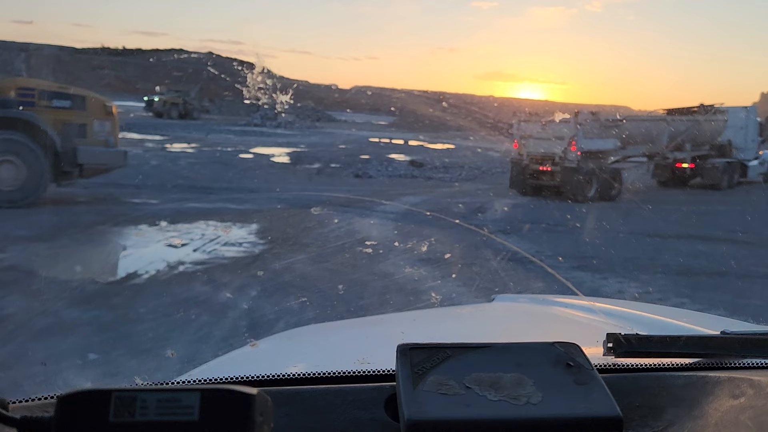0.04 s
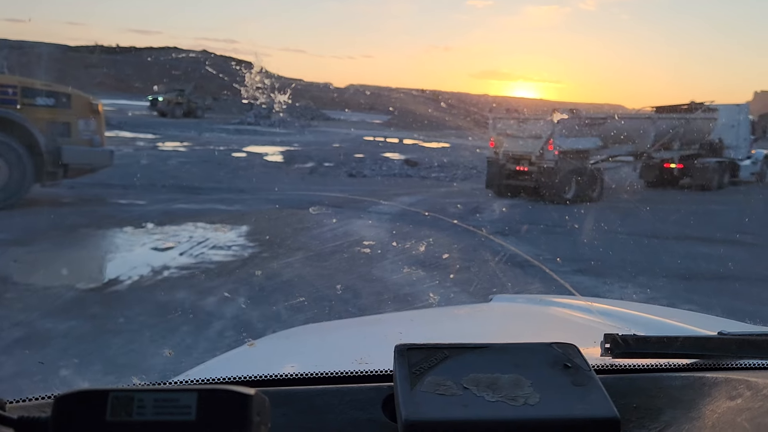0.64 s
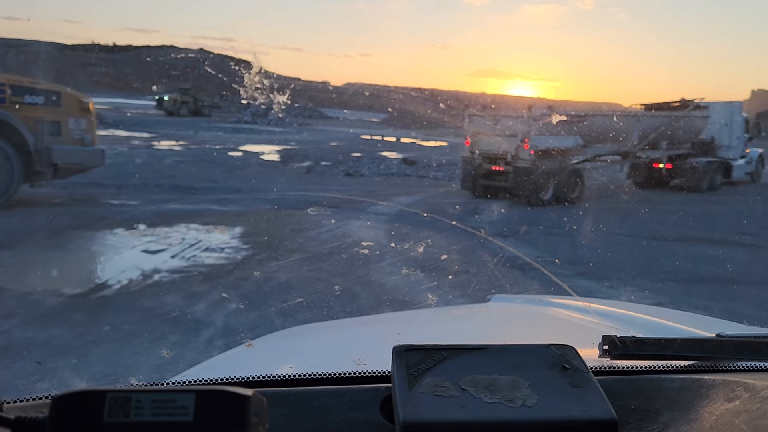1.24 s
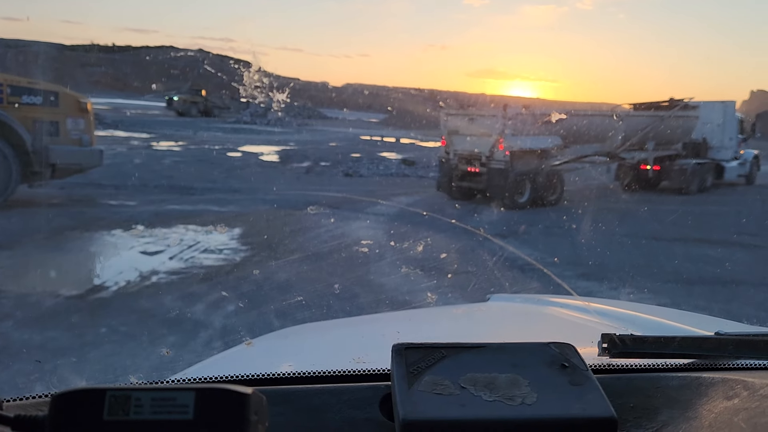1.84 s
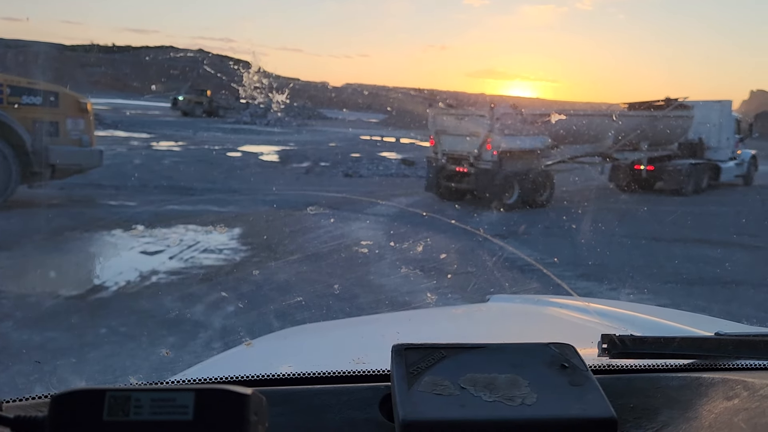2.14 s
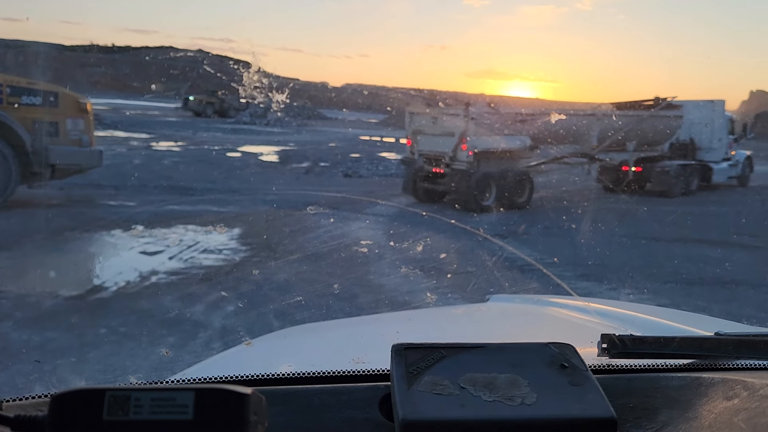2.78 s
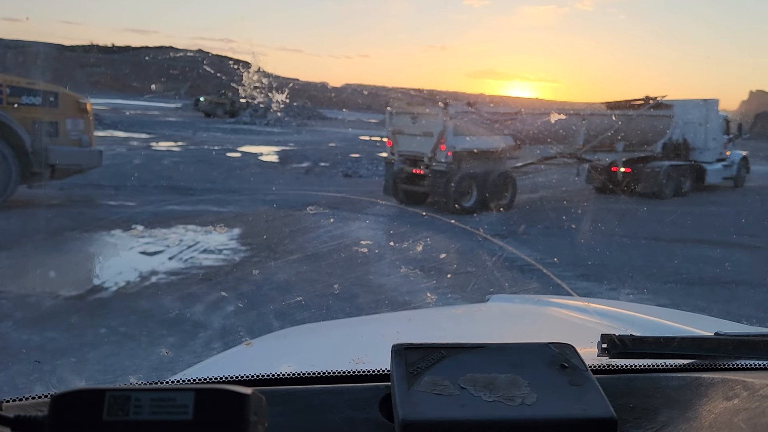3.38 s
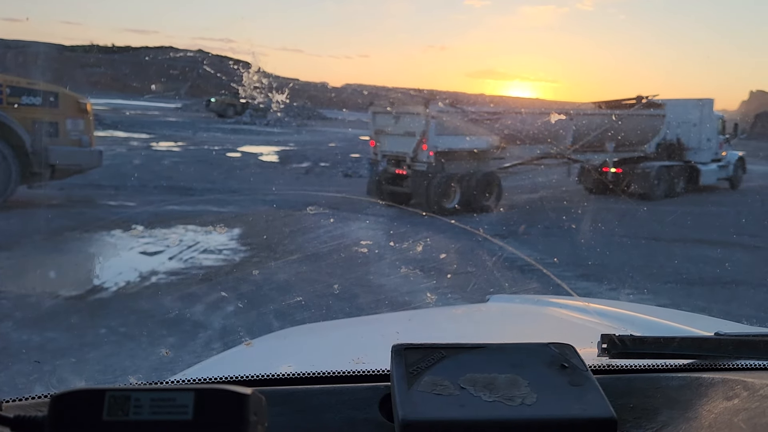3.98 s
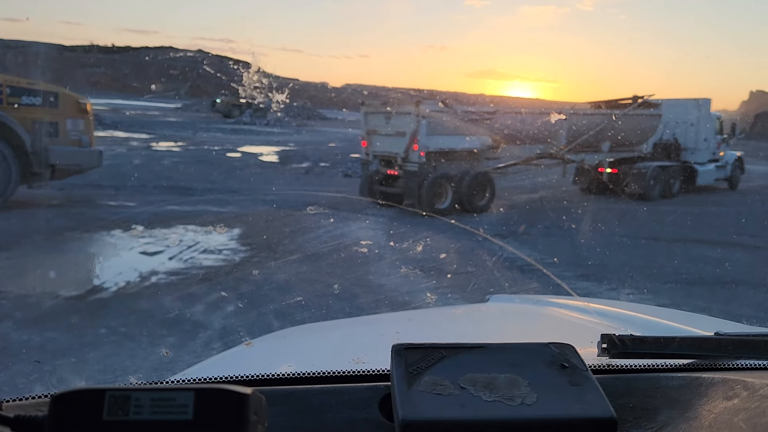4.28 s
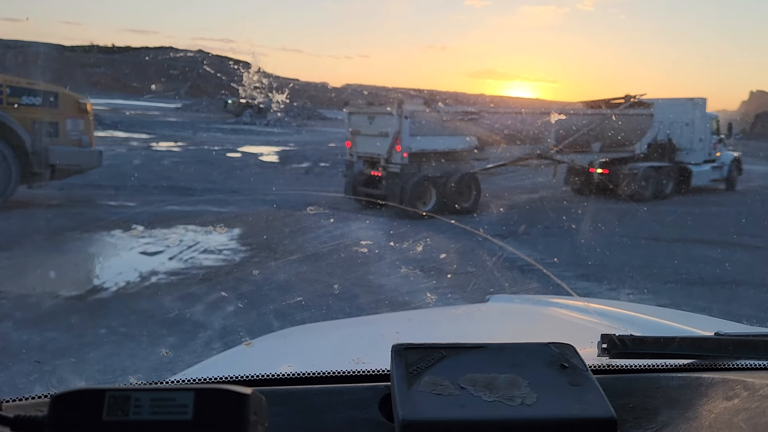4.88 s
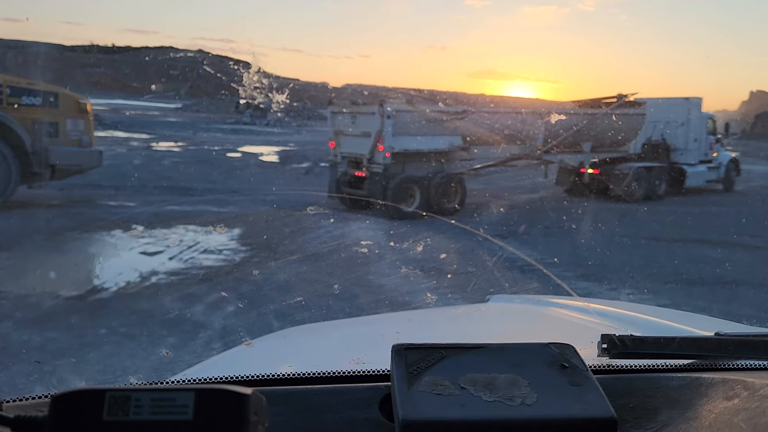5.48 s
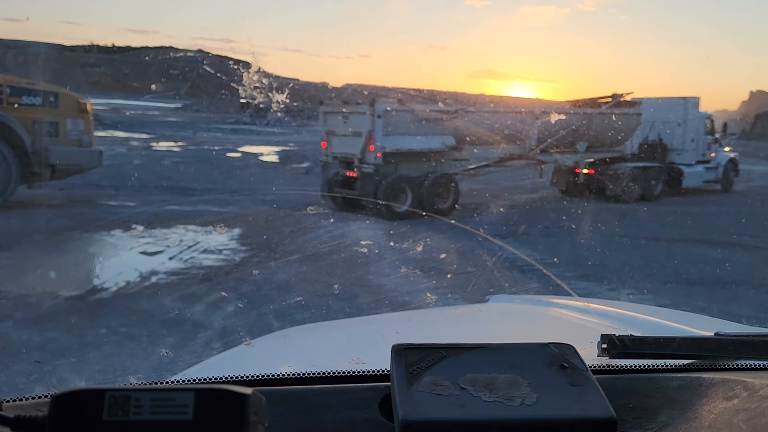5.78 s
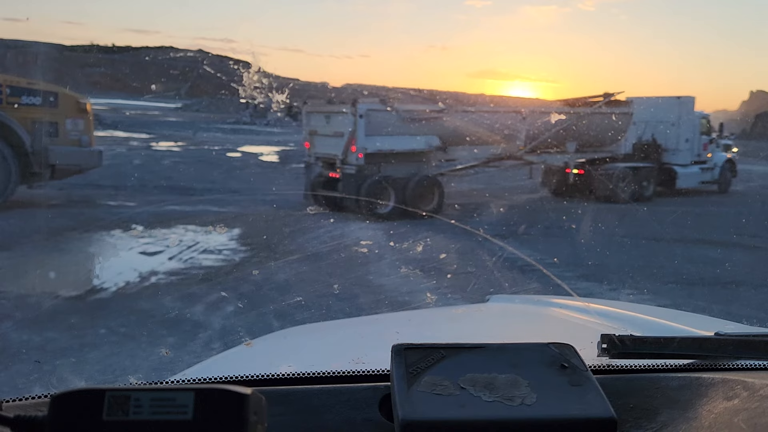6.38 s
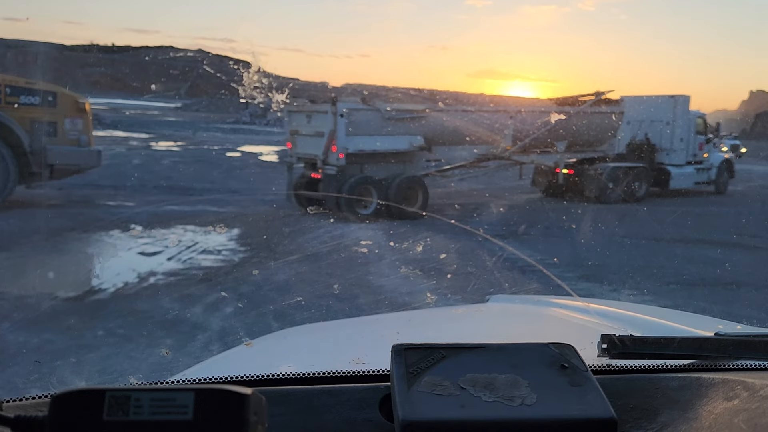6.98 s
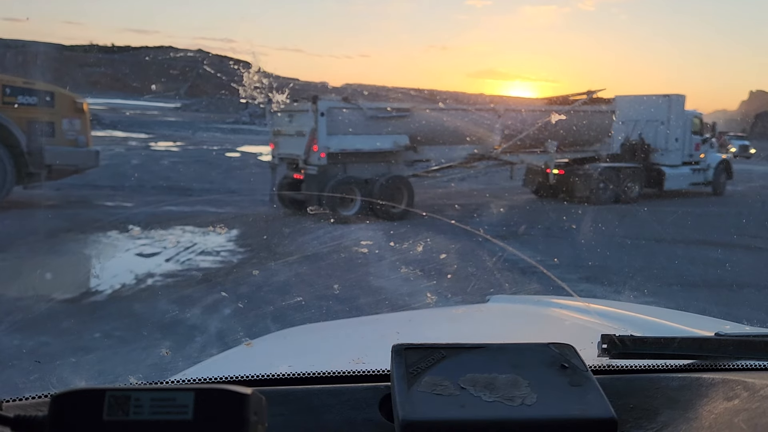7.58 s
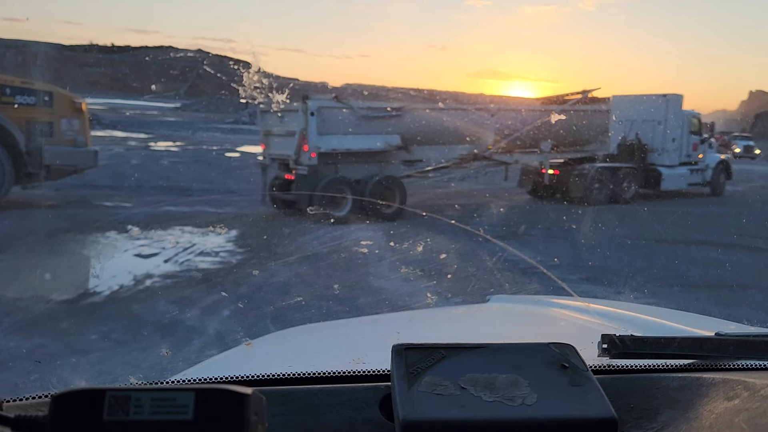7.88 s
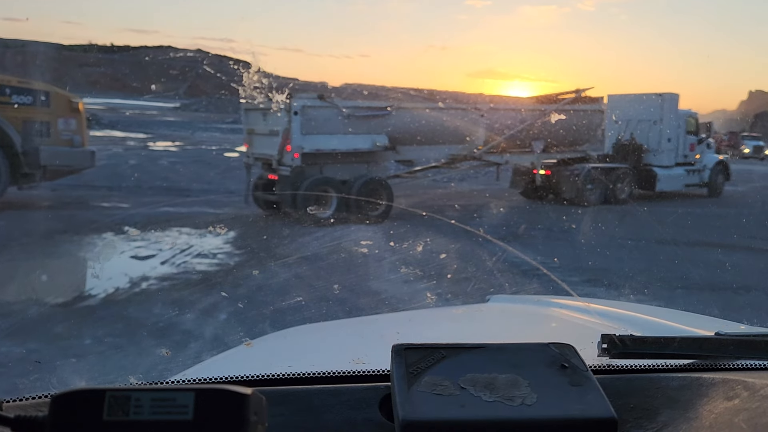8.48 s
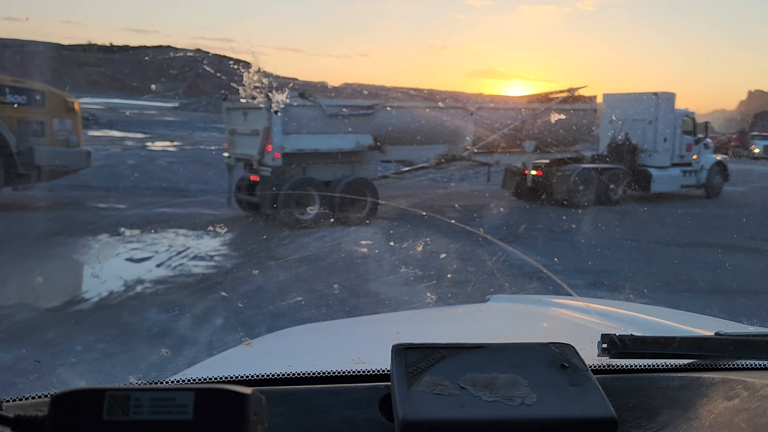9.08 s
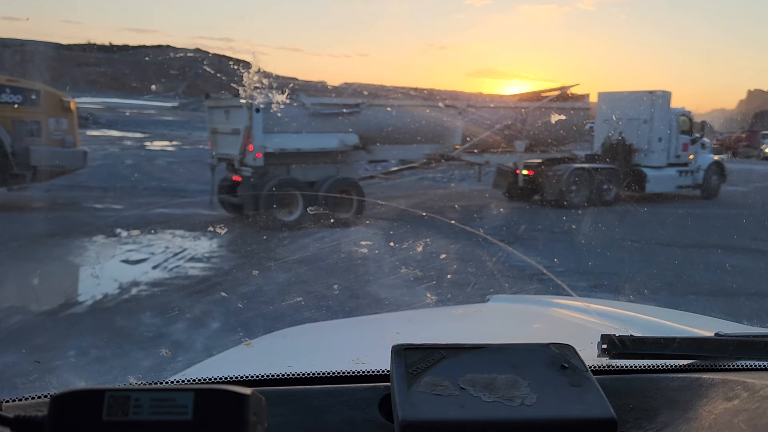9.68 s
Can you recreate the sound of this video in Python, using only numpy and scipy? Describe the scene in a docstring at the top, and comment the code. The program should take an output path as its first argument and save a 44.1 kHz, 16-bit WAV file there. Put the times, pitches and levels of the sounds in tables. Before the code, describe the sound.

From inside a truck cab, a low diesel drone and a fast, even throb continue as the tyres roll slowly over a gravel yard. The boom deepens as the engine takes up load, and a short burst of trim rattles is followed by another clack. Faint, high plastic squeaks come and go. The shuddering builds, peaks and eases, and the dashboard clicks near the end.

```python
"""A six-cylinder diesel truck creeps over a gravel yard at idle, heard from inside the cab.
From the start the firing drones, the tyres rumble and the cab thumps about twelve times a second;
clatter and air hiss come through the firewall, with thin whines and a ticking dashboard.
As the engine takes up load a plastic joint starts to squeak; trim rattles near 3 s and 5 s.
Around 7 s the idle sags and the cab shakes hardest, then the governor recovers and it settles."""
import sys
import numpy as np
from scipy import signal
from scipy.fft import rfft, irfft, next_fast_len
from scipy.io import wavfile

SR = 44100
rng = np.random.default_rng(int(sys.argv[2]) if len(sys.argv) > 2 else 0)


def generate_wav(sig):
    """Save sig (samples, or channels by samples) to the path in sys.argv[1] as 16-bit PCM at SR."""
    pcm = np.round(np.clip(np.atleast_2d(sig).T, -1, 1) * 32767).astype(np.int16)
    wavfile.write(sys.argv[1], SR, pcm)


N = 429534
LOADING_S = (0.68, 5.7)  # the engine takes up load between these times


def gain_of(db):
    """Decibels to a gain factor."""
    return 10 ** (np.asarray(db) / 20)


def unit_rms(x):
    """Scales to an rms of one."""
    return x / np.sqrt(np.mean(x ** 2) + 1e-20)


def ramp(start_s, end_s):
    """A linear fade from zero to one."""
    return np.clip((np.arange(N) / SR - start_s) / max(end_s - start_s, .01), 0, 1)


def automation(rows):
    """One lane, sample by sample, for each column after a table's times."""
    times_s, *columns = np.transpose(rows)
    return [np.interp(np.arange(N) / SR, times_s, column) for column in columns]


def add(mix, start_s, sound):
    """Mixes a sound in at a time."""
    part = mix[..., max(round(start_s * SR), 0):][..., :sound.shape[-1]]
    part += sound[..., :part.shape[-1]]


def bins():
    """Frequencies of the whole scene's spectrum."""
    return np.fft.rfftfreq(next_fast_len(N), 1 / SR)


def spectrum(points):
    """Joins breakpoints on a log-frequency axis, giving a value for each bin."""
    hz, value = np.transpose(points)
    return np.interp(np.log(bins() + 1), np.log(hz + 1), value)


def equalise(x, db):
    """Filters by a gain for each bin."""
    size = next_fast_len(N)
    return irfft(rfft(x, size) * gain_of(db), size)[..., :N]


def drift(rate_hz):
    """A smooth random modulator that rolls off above a rate."""
    return unit_rms(equalise(rng.standard_normal(N), -np.minimum(10 * (bins() / rate_hz) ** 2, 200)))


# How alike the cab sounds at the two ears: freq_hz, correlation
EAR_LIKENESS = [(30, 0.65), (130, 1), (250, 0.56), (500, 0.7), (1000, -0.17), (2000, 0), (12000, 0)]

def cab_noise(shape_db, drive=1.):
    """Driven noise filling the cab, at unit rms: alike at both ears in the bass, unrelated up high."""
    alike = np.clip(spectrum(EAR_LIKENESS), -.999, .999)
    mid, side = rng.standard_normal((2, N)) * drive
    mid = equalise(mid, shape_db + 10 * np.log10(1 + alike))
    side = equalise(side, shape_db + 10 * np.log10(1 - alike))
    return unit_rms(np.array([mid + side, mid - side]))


# The idle sags under load, then the governor recovers: time_s, firing_rate_hz
FIRING_RATE = [(0, 36.27), (6.2, 36.2), (7.0, 35.32), (7.9, 36.12), (9.1, 36.35), (9.6, 36.7)]

def engine_cycles():
    """Running count of four-stroke cycles: each is two crank turns and one firing per cylinder."""
    return np.cumsum(automation(FIRING_RATE)[0]) / SR / len(CYLINDER_KNOCKS)


# Strong engine tones, each fading to a new level: firing_multiple, before_db, after_db, start_s, end_s
BOOM_TONES = [(1, -27, -17, 1.3, 4.2), (2, -24.6, -20.3, 6.3, 6.8), (2.5, -29, -24.5, 2.5, 8),
              (4, -28, -25, 7.4, 8.1)]
# Weaker engine tones: upper firing harmonics, plus tones between them that make the idle lope:
# cycle_multiple, level_db
WEAK_TONES = [(4, -44), (5, -42), (9, -32.5), (11, -38), (13, -38), (14, -38), (16, -42), (18, -35.5),
              (21, -44), (23, -46), (26, -43), (30, -43), (32, -39), (36, -45), (42, -47), (44, -49),
              (48, -47), (60, -57)]

def drone(cycles, ease_from_s=4.5, ease_db_per_s=0.73, wander_db=.7, waver=0.16):
    """Exhaust pulses boom in the cab, over weaker upper harmonics and loping tones between harmonics."""
    out = np.zeros(N)
    ease_db = ease_db_per_s * np.maximum(np.arange(N) / SR - ease_from_s, 0)
    for multiple, before_db, after_db, start_s, end_s in BOOM_TONES:
        db = before_db + (after_db - before_db) * ramp(start_s, end_s)
        db += -ease_db if multiple == 1 else wander_db * drift(1.0)  # the deepest boom eases off
        out += gain_of(db) * np.cos(2 * np.pi * multiple * len(CYLINDER_KNOCKS) * cycles)
    for multiple, db in WEAK_TONES:
        level = gain_of(db) * (1 + waver * drift(0.69))
        out += level * np.cos(2 * np.pi * (multiple * cycles + rng.random()))
    return np.sqrt(2) * out


# Roughness of the ground: time_s, panels_db, rumble_db
GROUND_LEVELS = [(0, -35, -17), (.3, -36, -24), (1.1, -35.5, -22.5), (1.9, -34.5, -23), (2.9, -32.5, -24),
                 (3.5, -36.5, -22), (7, -33, -22.5), (8.5, -35.5, -25), (9.7, -34.5, -23.5)]
# Tone of the drumming body panels: freq_hz, gain_db
PANEL_EQ = [(90, -47), (170, -4.5), (270, 1), (320, 0), (365, -0.5), (435, -8.5), (700, -48)]
# Tone of the rumbling frame: freq_hz, gain_db
RUMBLE_EQ = [(10, -24), (20, -7), (30, 0.5), (50, 6), (62, -1.5), (82, 1.5), (100, 5.5), (125, -2.5),
             (185, -4), (225, -11.5), (400, -77)]

def chassis(cycles, throb_db=2.3, lumps_db=2):
    """Tyres rumble through the frame and drum on the body panels, which throb with every crank turn."""
    panels_db, rumble_db = automation(GROUND_LEVELS)
    throb = np.cos(2 * np.pi * (2 * cycles - 0.02))
    panels = cab_noise(spectrum(PANEL_EQ), gain_of(throb_db * throb + lumps_db * drift(9.4)))
    rumble = cab_noise(spectrum(RUMBLE_EQ), gain_of(lumps_db * drift(9.8)))
    return gain_of(rumble_db) * rumble + gain_of(panels_db) * panels


# Accent of each cylinder, in firing order: level_db
CYLINDER_KNOCKS = [5, 1.5, -8, 3.5, 5.5, 1]

def knocks(cycles, decay_firings=0.47, scatter_db=2):
    """An envelope with a sharp attack at every firing, each cylinder with its own strength."""
    firing, since = np.divmod(cycles * len(CYLINDER_KNOCKS), 1)
    firing = firing.astype(int)
    accent_db = np.array(CYLINDER_KNOCKS)[firing % len(CYLINDER_KNOCKS)]
    return gain_of(accent_db + scatter_db * rng.standard_normal(N)[firing]) * np.exp(-since / decay_firings)


# Tone of the combustion clatter: freq_hz, gain_db
CLATTER_EQ = [(200, -11.5), (400, -10), (490, -1), (620, -2), (850, -3), (980, -13), (1300, -9),
              (1600, -11), (1870, -14), (2150, -15), (3250, -18), (3600, -22), (7400, -28.5), (8900, -50)]
# Resonances of the block and firewall: pitch_hz, width_hz, boost_db
BLOCK_RESONANCES = [(552, 8.4, 2), (760, 11.8, 7), (882, 38, 3), (1087, 164, 6), (1284, 90, 5.5),
                    (1510, 33, 1), (1724, 38, 9), (2035, 75, 4.5), (2144, 36, 6), (2300, 45, 6),
                    (2660, 47, 5), (2900, 45, 4.5), (3080, 33, 6.5), (3202, 41, 7)]

def clatter(knock, level_db=-33.0, depth=0.19, unloaded_treble_db=-2.0, split_hz=1400):
    """Combustion knocks ring the block and the firewall, duller until the engine takes up load."""
    ring_db = sum(db / (1 + (2 * (bins() - hz) / width) ** 2) for hz, width, db in BLOCK_RESONANCES)
    sound = cab_noise(spectrum(CLATTER_EQ) + ring_db, 1 + depth * knock)
    treble = sound - equalise(sound, -20 * np.log10(1 + (bins() / split_hz) ** 4))
    sound += (gain_of(unloaded_treble_db * (1 - ramp(*LOADING_S))) - 1) * treble
    return gain_of(level_db + 0.024 * automation(SHAKE_LEVEL)[0]) * sound  # faintly follows the shaking


# Tone of the air hiss: freq_hz, gain_db
HISS_EQ = [(1500, -24), (4000, 14.5), (6300, 7.5), (7400, 12.5), (8100, 6), (8800, -2), (10700, 1),
           (11800, 6.5), (12600, 7), (13300, 1), (14000, 1), (15700, -5)]
# Its fader moves: time_s, relative_db
HISS_FADER = [(0.1, -63.5), (.6, -68), (2.4, -68), (2.9, -65.5), (7, -65.5), (7.6, -62), (8.2, -66)]

def hiss(knock, makeup_db=13.5, flutter_db=.8, depth=0.11):
    """Air hiss pulses with the engine and flutters slightly."""
    level_db = automation(HISS_FADER)[0] + makeup_db + flutter_db * drift(12)
    return gain_of(level_db) * cab_noise(spectrum(HISS_EQ), 1 + depth * knock)


# Whines and hums of machinery: start_s, end_s, pitch_hz, level_db
WHINE_CUES = [(0, 1.4, 1205, -47.5), (0, .8, 1095, -51), (0, 4.1, 1738, -56), (0, 1.0, 3085, -56),
              (.87, 1.27, 1732, -49), (1.75, 2.25, 3095, -55), (1.8, 2.7, 1205, -52), (1.8, 3.2, 365, -44),
              (3.05, 3.95, 1205, -49), (3.05, 3.95, 1100, -51), (3.05, 3.95, 2615, -56),
              (2.4, 7, 3190, -61), (9.15, 9.8, 1100, -52), (9.15, 9.8, 1280, -51)]

def whines(fade_s=0.14, width_hz=24, fuzz=.65):
    """Thin machinery tones, roughened by a narrow band of noise, swell and sink into the clatter."""
    out = np.zeros((2, N))
    lowpass = signal.butter(2, width_hz / 2, fs=SR, output="sos")
    for start_s, end_s, hz, db in WHINE_CUES:
        t = np.arange(0, max(end_s - start_s, fade_s), 1 / SR)
        real, imag = signal.sosfilt(lowpass, rng.standard_normal((2, 2, N // 2))[..., :len(t)])
        wobble = 1 + fuzz * (unit_rms(real) + 1j * unit_rms(imag))
        tone = unit_rms((wobble * np.exp(2j * np.pi * hz * t)).real)
        fade = np.minimum(np.minimum(t, t[-1] - t) / fade_s, 1)
        add(out, start_s, gain_of(db) * fade * tone)
    return out


# Tone of the fine buzz: freq_hz, gain_db
BUZZ_EQ = [(3000, -10), (6000, 0), (7350, -8), (8600, -12), (10500, -11), (12400, -5), (13500, -12),
           (15500, -11)]

def buzz(knock, loaded_db=-63, grains_per_s=110, spread_db=2.2, decay_s=0.0013):
    """Small loose parts tick finely in time with the firing, growing louder under load."""
    struck = rng.random(N) < grains_per_s / SR * knock / knock.mean()
    hits = struck * gain_of(spread_db * np.minimum(rng.exponential(1, N), 3))
    grains = unit_rms(signal.lfilter([1], [1, -np.exp(-1 / (decay_s * SR))], hits))
    level = gain_of(loaded_db) * (1 + ramp(*LOADING_S)) / 2
    return level * grains * cab_noise(spectrum(BUZZ_EQ))


# How hard the engine shakes the cab: time_s, relative_db
SHAKE_LEVEL = [(0, -16), (1.1, -20), (1.8, -11.5), (4.3, -6), (5.9, -8), (6.25, -3.5), (7.0, 3.5),
               (7.6, -1.5), (8.2, -7.5), (9, -17)]
# Hard jolts from the ground or the labouring engine: start_s, level_db
HARD_JOLTS = [(0.342, -15), (.401, -20), (.867, -19.5), (1.481, -18), (1.617, -16), (1.781, -19),
              (2.025, -17.5), (2.304, -23.5), (2.494, -23), (2.716, -21), (2.854, -19.5), (3.02, -18),
              (3.132, -19.5), (3.437, -19), (3.654, -21.5), (3.79, -19.5), (3.872, -18), (3.954, -17),
              (4.286, -20), (4.371, -16.5), (4.448, -18), (4.784, -19.5), (4.977, -18.5), (5.145, -18),
              (5.221, -20), (5.559, -16.5), (5.629, -24), (6.005, -16), (6.195, -15.5), (6.276, -16),
              (6.354, -13.5), (6.441, -15), (6.609, -14.5), (7.117, -14.5), (7.288, -15), (7.462, -16.5),
              (7.63, -19), (8.124, -16.5), (8.401, -20.5)]

def jolts(cycles, thump_phase=.83, thump_db=-17.5, scatter_db=1.2, gap_s=.035):
    """Cues (start_s, level_db): the hard jolts, plus a thump each crank turn unless one is too close."""
    at = np.flatnonzero(np.diff(np.floor(2 * cycles - thump_phase)))
    scatter = rng.uniform(-1, 1, N)[:len(at)]
    thumps = zip(at / SR, thump_db + automation(SHAKE_LEVEL)[0][at] + scatter_db * scatter)
    return HARD_JOLTS + [(s, db) for s, db in thumps if all(abs(s - h) > gap_s for h, _ in HARD_JOLTS)]


# Modes of the cab that a jolt sets swinging: pitch_hz, attack_s, gain_db
CAB_MODES = [(80.9, 0.034, -3), (160, .016, -.5), (250, .016, -5.5), (284, 0.015, -9.5), (395, 0.013, -19),
             (490, 0.012, -11)]

def shudder(cues, detune=0.061, steepness=3.8, width=0.48, bright_above_db=-11.5):
    """Each jolt swells and dies in the cab's heavily damped modes; hard jolts knock more brightly."""
    t, out = np.arange(SR // 8) / SR, np.zeros((2, N))
    pivot_hz = CAB_MODES[1][0]
    for start_s, db in cues:
        for hz, attack_s, mode_db in CAB_MODES:
            tuning, phase, side = rng.standard_normal(3)
            swell = (t / attack_s * np.exp(1 - t / attack_s)) ** steepness
            tilt_db = 0.36 * (db - bright_above_db) * np.log2(hz / pivot_hz)
            # Short waves reach the ears out of step.
            ear_phase = np.array([[1], [-1]]) * width * side * min(hz / 280, 1.5) ** 2
            turns = hz * (1 + detune * tuning) * t + 0.29 * phase
            swing = swell * np.cos(2 * np.pi * turns + ear_phase)
            add(out, start_s, gain_of(db + mode_db + tilt_db) * swing)
    return out


# Clear clicks of a small hard dashboard part: start_s, level_db
CLICK_CUES = [(.95, -52), (2.10, -46), (6.31, -51), (6.87, -43), (7.077, -45), (8.435, -30.5), (8.446, -37),
              (8.457, -44)]
# Tone of a click: freq_hz, gain_db
CLICK_EQ = [(1500, -5), (2700, 10), (3700, 5), (5000, 10), (6500, 1), (8500, -8), (10000, -10), (12000, -2),
            (14500, -3), (15500, -5)]

def clicks(ticks_per_s=12, tick_db=-61, attack_s=.0015, decay_s=0.0087):
    """The dashboard gives a few clear clicks among many tiny random ticks."""
    struck = rng.random(N) < ticks_per_s / SR
    hits = gain_of(tick_db) * struck * np.minimum(rng.exponential(1, N), 2.5)
    for start_s, db in CLICK_CUES:
        add(hits, start_s, gain_of([db]))
    t = np.arange(SR // 10) / SR
    envelope = (1 - np.exp(-t / attack_s)) * np.exp(-t / decay_s)
    return signal.oaconvolve(hits, envelope)[:N] * cab_noise(spectrum(CLICK_EQ))


# Resonances of a rubbing plastic joint: pitch_hz, gain_db
JOINT_MODES = [(7330, 1), (9880, -11), (12500, 0), (15330, -12)]
# Its loudest chirps: centre_s, level_db
CHIRP_CUES = [(3.61, -58), (5.44, -58), (5.50, -59), (5.55, -57), (5.64, -59), (5.70, -56), (6.88, -61),
              (7.57, -60), (7.78, -61), (8.215, -58), (8.38, -55), (8.88, -64), (9.06, -62), (9.22, -61.5),
              (9.39, -64)]

def squeaks(knock, fade_in_s=(2, 5), bed_db=-66.5, wander_db=3.3, chirp_s=.06, width_hz=110):
    """A plastic joint rubs and chirps, soft and very high, trembling with the firing."""
    rub = gain_of(bed_db + wander_db * drift(14)) * ramp(*fade_in_s)
    for centre_s, db in CHIRP_CUES:
        add(rub, centre_s - chirp_s / 2, gain_of(db) * np.hanning(int(chirp_s * SR)))
    peaks = sum(gain_of(db) / (1 + (2 * (bins() - hz) / width_hz) ** 4) for hz, db in JOINT_MODES)
    return rub * unit_rms(1 + .3 * knock) * cab_noise(20 * np.log10(peaks + 1e-9))


# Clacks of loose trim: start_s, level_db, decay_s, pitch_hz, ring_db, snap_db
RATTLE_CUES = [(2.772, -35, 0.0055, 1600, 3, -16), (2.788, -37, 0.0055, 1580, 2, -16),
               (2.849, -27.5, 0.0066, 1634, 4.5, -6), (2.907, -29.5, 0.0062, 1590, 4.5, -20),
               (2.981, -25, 0.0062, 1660, 3.5, -2.5), (4.946, -36, .018, 1650, -8, -2),
               (4.985, -48, .023, 1640, 0, -3)]
# Modes of the trim panel: pitch_multiple, gain_db, decay_multiple
TRIM_PANEL_MODES = [(.185, -6, 4), (.315, -12, 2.5), (.39, -11, 2.5), (.5, -13, 2), (.675, -11, 1),
                    (.8, -9, .7), (.93, -3, .8), (1, 2, .9), (1.07, -3, .7), (1.32, -11, .7),
                    (1.9, -17, .8)]
# Tone of the woody after-ring: freq_hz, gain_db
WOODY_EQ = [(200, -8), (305, -8), (450, 4), (800, 5), (1100, 9), (1450, 3), (1620, 7), (1850, -1),
            (3000, -3.5), (5000, -9), (9000, -56)]
# Tone of the snap: freq_hz, gain_db
SNAP_EQ = [(1200, -5), (2600, 9), (4800, 10.5), (7300, 1), (8700, -13), (12300, -17), (15500, -24)]

def rattles(attack_s=0.0015, ring_attack_s=0.0055, tail_s=0.042, hit_db=-9, tail_db=-8, modes_db=5.5):
    """Loose trim clacks: the panel's modes ring, with a bright snap and a longer, woody after-ring."""
    t = np.arange(SR // 3) / SR
    woody, snap, ring = np.zeros(N), np.zeros(N), np.zeros((2, N))
    for start_s, db, decay_s, hz, ring_db, snap_db in RATTLE_CUES:
        onset = gain_of(db) * (1 - np.exp(-t / attack_s))
        fall = np.exp(-t / decay_s)
        tail = gain_of(tail_db) * np.exp(-t / tail_s)
        add(woody, start_s, onset * gain_of(ring_db) * (gain_of(hit_db) * fall + tail))
        add(snap, start_s, onset * fall * gain_of(snap_db))
        ring_onset = gain_of(db + ring_db + modes_db) * (1 - np.exp(-t / ring_attack_s))
        for multiple, mode_db, lasts in TRIM_PANEL_MODES:
            mode_hz = hz * multiple * rng.normal(1, .02)  # each blow lands elsewhere on the panel
            tone = np.sin(2 * np.pi * mode_hz * t + 2 * rng.random((2, 1)))
            add(ring, start_s, ring_onset * gain_of(mode_db) * fall ** (1 / lasts) * tone)
    return ring + woody * cab_noise(spectrum(WOODY_EQ)) + snap * cab_noise(spectrum(SNAP_EQ))


# Soft rustles: centre_s, level_db, length_s
RUSTLE_CUES = [(2.885, -48.5, 0.13), (2.955, -48, 0.14), (3.14, -49.5, 0.16), (3.81, -48.5, 0.2),
               (4.972, -48, 0.18), (7.487, -52, 0.41)]
# Tone of their grit: freq_hz, gain_db
GRIT_EQ = [(2500, 0), (5000, 7), (7400, 6), (8700, -5), (12000, 0), (15500, -4)]

def rustles(grain_db=3):
    """Short swells of bright noise, made gritty by a fast flicker in level."""
    swell = np.zeros(N)
    for centre_s, db, length_s in RUSTLE_CUES:
        add(swell, centre_s - length_s / 2, gain_of(db) * np.hanning(int(length_s * SR)))
    return swell * gain_of(grain_db * drift(150)) * cab_noise(spectrum(GRIT_EQ))


# Stereo balance of the cab: freq_hz, left_minus_right_db
BALANCE = [(40, 0.5), (100, 1.5), (160, 1.5), (270, 8), (380, -4), (550, 2), (740, 3), (1220, 3.5),
           (2000, 2.5), (3300, 2), (6500, 1), (9000, 0.5), (11800, -7.5), (15000, 3)]

def scene():
    """Engine and cab share the crankshaft's rhythm; the mix leans left at most frequencies."""
    cycles = engine_cycles()
    knock = knocks(cycles)
    engine = drone(cycles) + clatter(knock) + hiss(knock) + whines()
    cab = chassis(cycles) + rattles() + rustles() + clicks() + buzz(knock) + squeaks(knock)
    cab += shudder(jolts(cycles))
    return equalise(engine + cab, np.array([[.5], [-.5]]) * spectrum(BALANCE))


def record(dry, cutoff_hz=15750):
    """A steep low-pass takes off the very top of the treble."""
    lowpass = signal.firwin(511, cutoff_hz, window=("kaiser", 9), fs=SR)
    return signal.oaconvolve(dry, lowpass[None], "same")


dry = scene()
out = record(dry)
generate_wav(out)
```